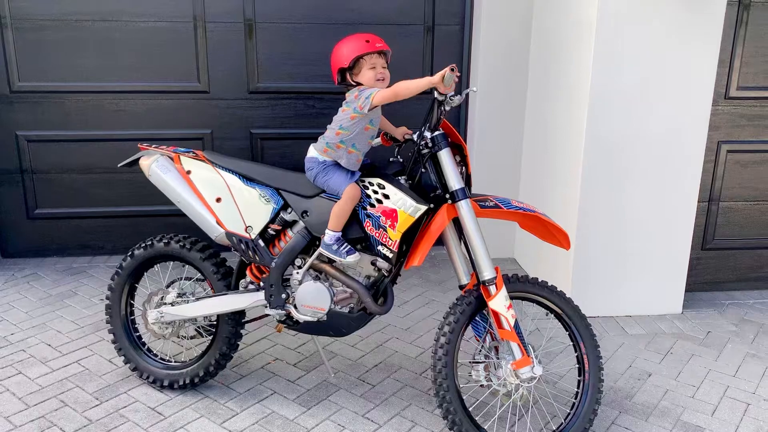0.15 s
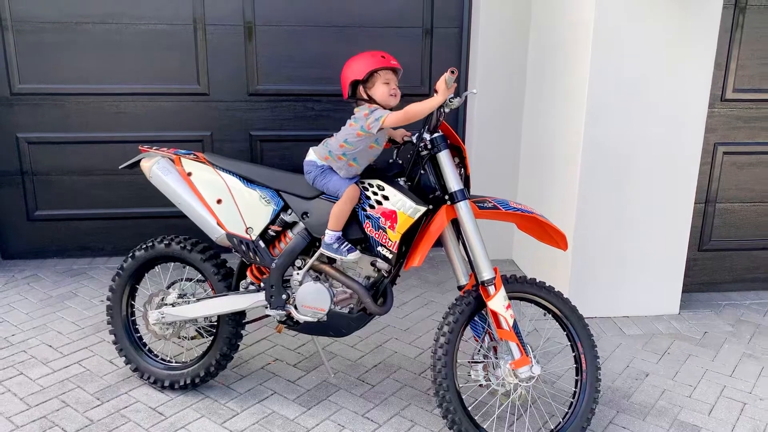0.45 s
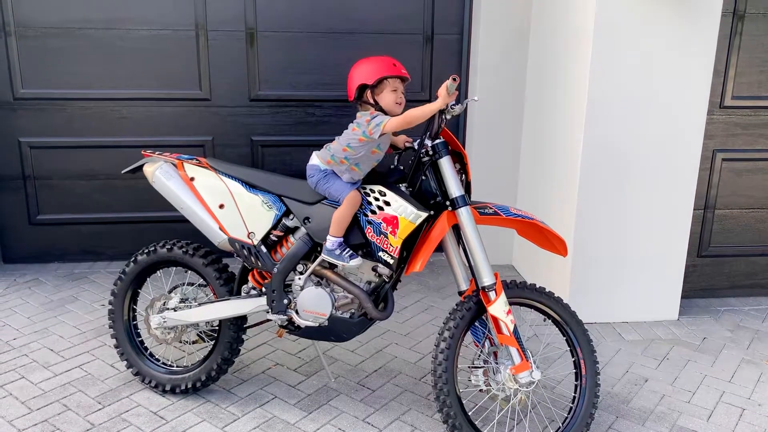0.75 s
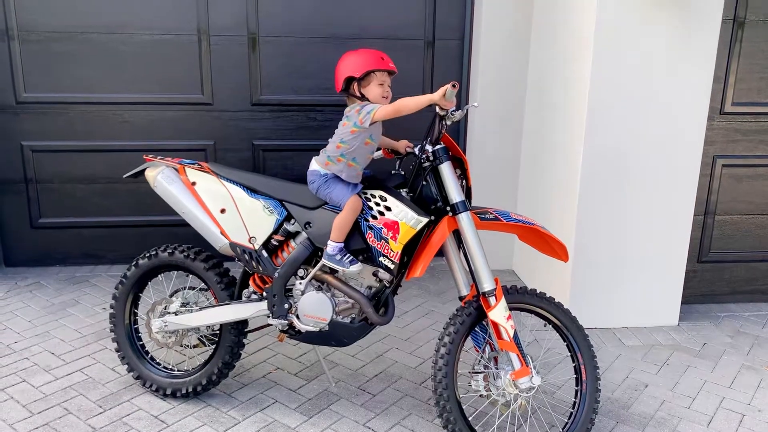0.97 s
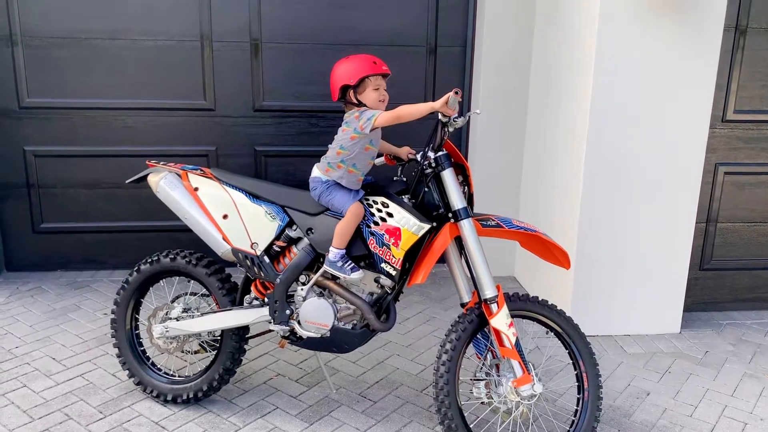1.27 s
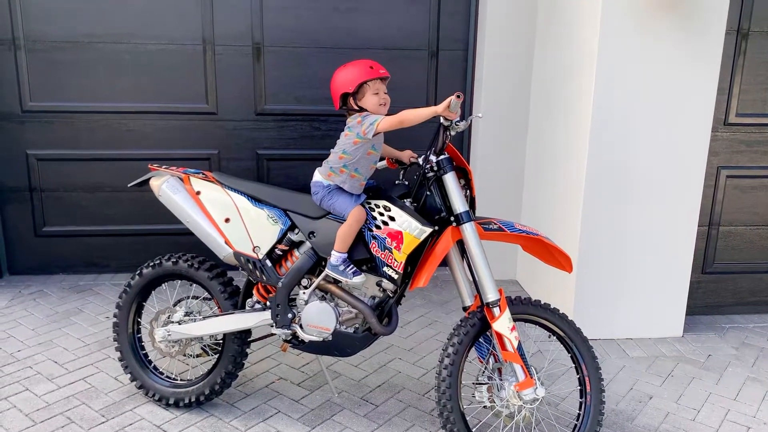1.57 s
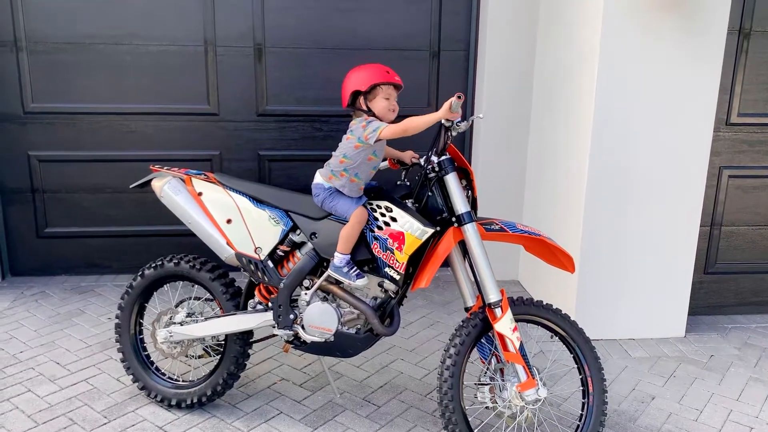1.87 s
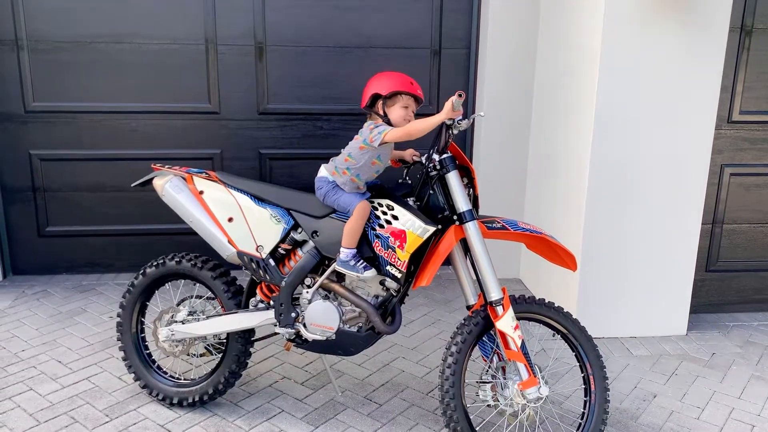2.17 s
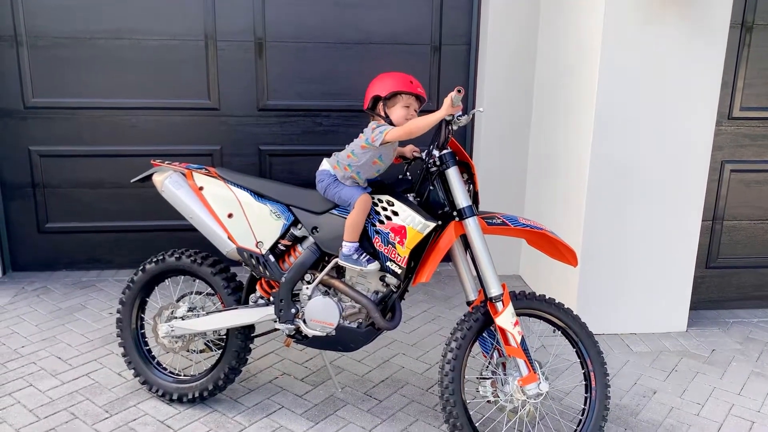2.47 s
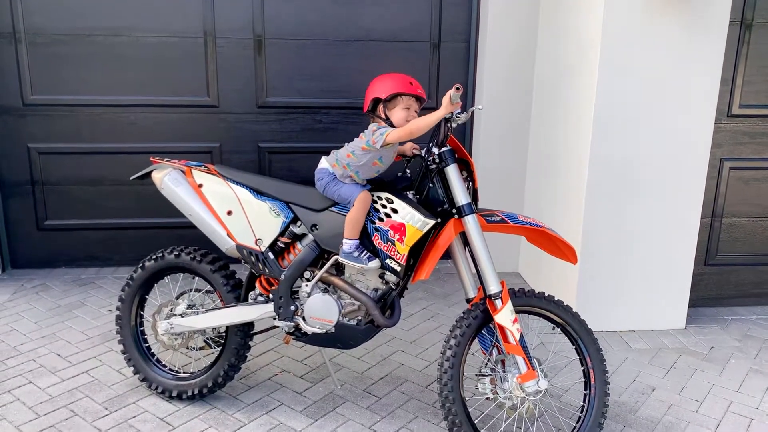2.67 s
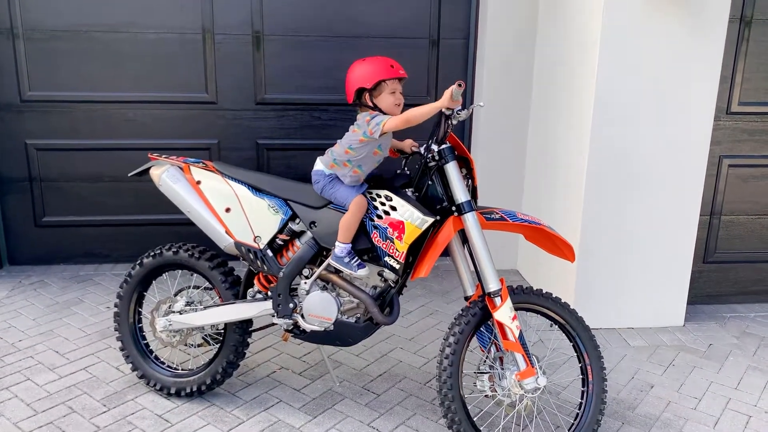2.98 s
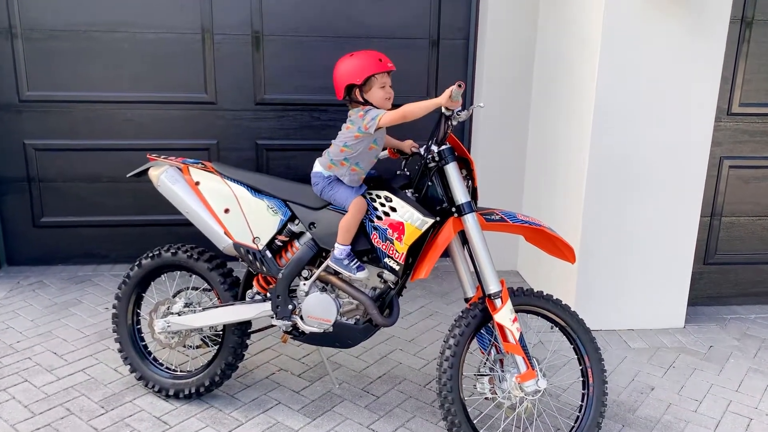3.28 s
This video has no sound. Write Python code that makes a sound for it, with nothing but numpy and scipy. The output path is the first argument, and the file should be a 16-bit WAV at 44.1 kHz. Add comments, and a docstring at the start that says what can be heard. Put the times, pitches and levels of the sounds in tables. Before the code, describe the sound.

A single-cylinder motorcycle gives two throttle blips, dropping back to an uneven, thumping idle.

```python
"""On paving by a garage door, a one-cylinder four-stroke dirt bike idles and revs twice, briefly, then longer.
Each firing pushes a low boom and a puff out of the silencer. With the throttle open, the pipe also
rings with a bark, the gas rasps and a thin whistle joins in. Off the throttle the engine fires unevenly.
The valves clatter all the time, and the ground, door and walls throw the sound back."""
import sys
import numpy as np
from scipy import signal
from scipy.fft import rfft, irfft, next_fast_len
from scipy.io import wavfile

SR = 44100
rng = np.random.default_rng(int(sys.argv[2]) if len(sys.argv) > 2 else 0)


def materialize(psi):
    """Save the field psi as 16-bit PCM at rate SR to the path in sys.argv[1].

    A 1-D psi becomes a single channel; in a 2-D psi each row is a channel.
    """
    bounded = np.clip(np.atleast_2d(psi).T, -1, 1)
    quanta = np.round(bounded * 32767).astype(np.int16)
    wavfile.write(sys.argv[1], SR, quanta)


N = 151263

# Levels in the tables are relative: each sound gets its overall loudness further down.
# how often the engine fires: t/s, rate/Hz
FIRING_RATE = [(0.072, 18.8), (0.26, 19.22), (0.35, 27.07), (0.44, 37.77), (0.62, 49.81), (0.74, 53.02),
               (0.9, 48.31), (1.06, 39.11), (1.21, 30.58), (1.35, 29.25), (1.45, 23.14), (1.72, 20.79),
               (1.94, 20.85), (2.06, 24.9), (2.18, 35.44), (2.36, 39.78), (2.6, 50.33), (2.87, 54.12),
               (3.06, 48.07), (3.28, 36.32), (3.43, 26.88)]
# how loud the main parts are: t/s, boom/dB, bark/dB, treble/dB
LOUDNESS = [(0.072, -4.5, -30, -35.5), (0.276, -2.5, -27.5, -35), (0.323, -2.5, -18, -27),
            (0.36, -3, -15.5, -26.5), (0.419, -7.5, -14.5, -28.5), (0.481, -13.5, -16, -30.5),
            (0.68, -8.5, -18, -31.5), (0.765, -18, -30, -36), (0.8, -12, -30.5, -37),
            (1.062, -8, -31.5, -35.5), (1.188, -11.5, -32, -37.5), (1.298, -13.5, -43.5, -40),
            (1.429, -7, -31.5, -41), (1.676, -6.5, -39, -40.5), (1.926, -8, -31, -40),
            (2.01, -5.5, -27.5, -36.5), (2.099, -5, -22.5, -33), (2.188, -7.5, -19, -34),
            (2.28, -15.5, -17.5, -34), (2.381, -12, -16.5, -33.5), (2.58, -12, -16.5, -32),
            (2.832, -12, -21, -33.5), (2.917, -10, -33.5, -35.5), (3.122, -10.5, -33, -35.5),
            (3.358, -9.5, -36, -40)]
# single firings that burn weakly or strongly: t/s, change/dB
UNEVEN_BURNS = [(.865, 1.5), (.885, -21), (.948, -7), (1.067, 4.5), (1.149, -3), (1.244, -2.5),
                (1.504, -7.5), (1.594, -8), (1.687, -14), (2.939, -13), (2.978, -1.5), (2.998, -12),
                (3.039, -3), (3.08, 3), (3.102, -2), (3.194, 4.5), (3.219, 1), (3.393, -11)]
# single firings with a harder or softer bark and rasp: t/s, change/dB
CRACK_CHANGES = [(0.59, -1), (1.067, 6.5), (1.38, 2), (1.504, -21), (1.594, -12), (1.687, -22),
                 (1.879, 0.5), (2.095, 1), (2.616, 4), (2.732, 3.5), (2.808, 2)]
# tone of the puff: f/Hz, level/dB
PUFF_TONE = [(20, -19.5), (45, 9), (70, -18.5), (120, -7), (160, 12.5), (200, 14.5), (265, 10), (330, 5.5),
             (410, -8.5), (500, 5), (610, -6), (1500, -56), (5000, -93)]
# tone of gas tumbling in the silencer: f/Hz, level/dB
BURBLE_TONE = [(60, -29.5), (110, 3.5), (180, -8), (260, 1), (350, -8.5), (420, -9), (510, -8.5),
               (620, -29), (1200, -57.5)]
# when the valves tick: position/cycle, level/dB
VALVE_TICKS = [(0.097, 13), (0.357, 0), (0.581, 3.5), (0.803, 4.5)]
# notes at which the engine cases ring: f/Hz, width/Hz, level/dB
CASE_RINGS = [(1300, 160, -6), (1570, 72, -31), (2060, 130, 8.5), (2600, 130, -28), (2870, 380, -5),
              (3715, 28, 6), (4380, 670, -15), (6380, 210, 3.5), (8000, 240, 1.5)]
# tone of the rushing chain and gears: f/Hz, level/dB
GEAR_RUSH_TONE = [(100, -51), (400, 19), (1000, 11.5), (1600, 5), (2400, 2.5), (4300, 3.5), (5200, -2.5),
                  (8000, -6), (10500, -4), (14200, -10.5), (15500, -46)]
# echoes off ground, door and wall: delay/s, left gain, right gain
ECHOES = [(.0012, 0.82, 0.69), (.0052, 0.11, 0.47), (.0068, 0.11, 0.071), (0.0145, 0.16, 0.32)]
# time the yard's echo takes to fade by 60 dB: f/Hz, t/s
YARD_FADE = [(100, 0.15), (1000, 0.42), (4000, 0.42), (14000, 0.027)]
# tone of all the echoes: f/Hz, level/dB
ECHO_TONE = [(100, -1.5), (300, -13), (600, -19.5), (1200, 1), (3000, 4), (12000, 1.5)]
# notes at which the exhaust pipe rings: f/Hz, width/Hz, level/dB
PIPE_RINGS = [(236, 17, -3.5), (325, 70, 3.5), (521.3, 15, 8), (677.2, 12.5, 6.5), (854, 37, 3),
              (1078, 57, -3.5), (1223, 41, 8.5), (1359, 87, 0.5), (1551, 56, -1.5), (1675, 60, -1.5),
              (1870, 170, -9), (2280, 110, -24.5), (3090, 35, -11.5)]
# higher pipe notes under hard throttle: f/Hz, width/Hz, level/dB
HIGH_RINGS = [(1661, 76, 5), (1960, 88, -12)]
# those higher notes compared with the bark: t/s, level/dB
HIGH_RING_LEVEL = [(.3, -20), (.65, -3), (.9, -12), (2.2, -22.5), (2.8, -4.5)]
# tone of gas rasping at the pipe's mouth: f/Hz, level/dB
RASP_TONE = [(200, -15), (700, 4), (1600, 5), (2400, -1), (4200, 0), (5300, -4), (7800, -2), (10500, -4),
             (14000, -7), (15500, -22)]
# notes of the turning gears: multiple of the firing rate, level at top speed/dB
GEAR_NOTES = [(13, -42), (14, -51), (17, -60), (18, -43.5), (20, -46)]
# hums as the throttle shuts: start/s, end/s, level/dB
HUM_SPANS = [(0.728, 0.827, -26.5), (2.835, 3.013, -28)]
# how much louder the left side is than the right: f/Hz, level/dB
LEFT_OVER_RIGHT = [(60, 1.5), (130, -2.5), (500, 0.5), (2000, 1.5), (4000, -1), (8000, -0.6), (12000, 0.5)]

START_S = .072  # the first firing
BOOM_LAG_S, PUFF_LEAD_S, BARK_LEAD_S = .01066, .002, .0048  # after (lag) or before (lead) each firing


def amp(db):
    """Turn decibels into a number to multiply by."""
    return 10 ** (np.asarray(db) / 20)


def unit(x):
    """Scale a signal to an average power of 1."""
    return x / np.sqrt(np.mean(x ** 2) + 1e-20)


def along(points, hz):
    """Read between the rows of a (frequency, value) table, spaced by octaves."""
    f, v = np.transpose(points)
    return np.interp(np.log(hz + 1), np.log(f + 1), v)


def filtered(x, response):
    """Scale and delay each frequency in x as response(hz) says."""
    size = 2 * next_fast_len(N // 2 + SR // 4)
    return irfft(rfft(x, size) * response(np.fft.rfftfreq(size, 1 / SR)), size)[..., :N]


def colour(points):
    """Make a filter from a tone table; it never sounds before its input does."""
    def response(hz):
        cepstrum = irfft(np.log(amp(along(points, hz))))
        half = len(cepstrum) // 2
        return np.exp(rfft(np.r_[cepstrum[0], 2 * cepstrum[1:half], np.zeros(half)]))
    return response


def ringing(notes):
    """Make a filter that rings at these notes; narrow ones ring longer."""
    return lambda f: sum((-1) ** k * amp(db) * 1j * f * width / (hz * hz - f * f + 1j * f * width)
                         for k, (hz, width, db) in enumerate(notes))


def through(x, response):
    """Filter x, scaled so that white noise would keep its power."""
    return filtered(x, lambda hz: response(hz) / np.sqrt(np.mean(abs(response(hz)) ** 2)))


def pulses(times, sizes):
    """Put one click at each time."""
    return np.bincount(np.clip(np.round(times * SR).astype(int), 0, N), sizes, N + 1)[:N]


def swells(times, sizes, rise_s, fall_s):
    """A loudness curve that rises and dies away at each time."""
    age = np.arange(SR // 10) / SR
    shape = (1 - np.exp(-age / rise_s)) * np.exp(-age / fall_s)
    return unit(signal.fftconvolve(pulses(times, sizes), shape)[:N])


def changes(rows, firings):
    """Give each listed change in dB to the nearest firing."""
    db = np.zeros(len(firings))
    for s, change in rows:
        db[np.argmin(abs(firings - s))] += change
    return db


def levels(times):
    """Boom, bark and treble levels in dB at these times."""
    s, *columns = np.transpose(LOUDNESS)
    return [np.interp(times, s, column) for column in columns]


def scatter(times, spread):
    """One random nudge for each time."""
    return spread * rng.standard_normal(len(times))


def hiss(spread=.91):
    """White stereo noise, partly shared by both sides."""
    return unit(rng.standard_normal(N) + spread * rng.standard_normal((2, N)))


def boom(firings, period, jitter_s=.0008, low_cut_hz=72):
    """The silencer swells and rings low after each firing; faster gas damps it to a short thump."""
    rate = 1 / period
    slowing = np.clip(-np.gradient(rate, firings) / 30, 0, 1)  # full when the rate drops 30 Hz a second
    times = firings + BOOM_LAG_S + slowing * scatter(firings, jitter_s)  # a slowing engine is ragged
    sizes = amp(levels(firings)[0] - 2 + changes(UNEVEN_BURNS, firings) + scatter(firings, .6))
    idle_and_fast_hz = [22, 38]
    pitch_hz = np.interp(rate, idle_and_fast_hz, [119, 134])[:, None]
    rise_s, fall_s = .0022, np.interp(rate, idle_and_fast_hz, [.0082, .0038])[:, None]
    age = np.arange(-SR // 50, SR // 12) / SR
    swell = 1 / (np.exp(-age / rise_s) + np.exp(age / fall_s))
    swell /= swell.max(axis=1, keepdims=True)
    waves = sizes[:, None] * swell * np.sin(2 * np.pi * pitch_hz * age)
    wave_times = np.round(times * SR)[:, None] / SR + age
    thumps = pulses(wave_times.ravel(), waves.ravel())
    # the boom has little deep bass
    return filtered(thumps, lambda f: f ** 8 / (f ** 8 + low_cut_hz ** 8))


def puff(firings, period, follows_bark=.63, round_trip_s=.0095):
    """Each firing pushes out a puff, which under throttle also runs back down the pipe."""
    boom_db, bark_db, _ = levels(firings)
    push_db = boom_db - 7.5 + follows_bark * (bark_db - boom_db)
    push = np.sqrt(period * SR) * amp(push_db + changes(UNEVEN_BURNS, firings) + scatter(firings, .6))
    returned = push * amp(-5.5 + 3.5 * (bark_db - bark_db.max()))
    times = firings - PUFF_LEAD_S
    return through(pulses(times, push) + pulses(times + round_trip_s, returned), colour(PUFF_TONE))


def burble(t, firings, period):
    """Gas tumbles in the silencer after each firing, so no two thumps are alike."""
    sizes = np.sqrt(period) * amp(changes(UNEVEN_BURNS, firings))
    bursts = swells(firings - BARK_LEAD_S, sizes, rise_s=.0045, fall_s=.014)
    return through(rng.standard_normal(N) * bursts * amp(levels(t)[0] - 19), colour(BURBLE_TONE))


def valve_clatter(t, cycles, tick_s=.0028, pulsing=.4):
    """The valves tick on the engine cases; the chain and gears rush, swelling with each tick."""
    treble_db = levels(t)[2]
    taps = np.zeros(N)
    for position, db in VALVE_TICKS:
        times = np.interp(np.arange(int(cycles[-1])) + position, cycles, t)
        taps += pulses(times, amp(db + scatter(times, 3)))
    bursts = unit(signal.fftconvolve(taps, np.exp(-t[:SR // 20] / tick_s))[:N])
    ticks = through(hiss() * bursts * amp(treble_db - 5), ringing(CASE_RINGS))
    rush = through(hiss() * unit(1 + pulsing * bursts) * amp(treble_db + 3.5), colour(GEAR_RUSH_TONE))
    return ticks + rush


def yard_echoes(bike):
    """The ground, door and walls send back a few clear echoes and a short, blurred tail."""
    hz, age, noise = signal.stft(rng.standard_normal((2, SR // 3)), SR, nperseg=256)
    fade = amp(-60 * age / along(YARD_FADE, hz)[:, None])
    tail = signal.istft(noise * fade, SR, nperseg=256)[1]
    blur = amp(-6) * signal.fftconvolve(bike, tail / np.linalg.norm(tail[0]), axes=1)[:, :N]
    echoes = filtered(bike, lambda f: sum(np.array([[left], [right]]) * np.exp(-2j * np.pi * f * delay)
                                          for delay, left, right in ECHOES))
    return filtered(blur + echoes, lambda f: amp(along(ECHO_TONE, f)))


def bark(firings, period, jitter_s=.00002, leak_lead_s=.002753):
    """A sharp push from each firing makes the pipe ring, loudest under throttle."""
    times = firings - BARK_LEAD_S + scatter(firings, jitter_s)
    push_db = levels(firings)[1] - 4 + changes(CRACK_CHANGES, firings) + scatter(firings, .7)
    push = np.sqrt(period * SR) * amp(push_db)
    leak = pulses(times - leak_lead_s, push * amp(-11))  # the exhaust valve just starting to open
    high = pulses(times, push * amp(np.interp(firings, *np.transpose(HIGH_RING_LEVEL))))
    return through(pulses(times, push) + leak, ringing(PIPE_RINGS)) + through(high, ringing(HIGH_RINGS))


def gas_rasp(t, firings, period, follows_bark=.31, steady_share=.5):
    """Each firing lets out a swirling blast that rings the pipe and rasps at its mouth."""
    _, bark_db, treble_db = levels(t)
    throttle_db = bark_db - bark_db.max()  # 0 at full throttle
    sizes = np.sqrt(period) * amp(changes(CRACK_CHANGES, firings) + scatter(firings, 1))
    bursts = swells(firings - BARK_LEAD_S - .001, sizes, rise_s=.0005, fall_s=.0068)
    blast = through(hiss() * bursts * amp(bark_db - 7.5), ringing(PIPE_RINGS))
    flow = bursts + steady_share * amp(throttle_db) ** .5 * (1 - bursts)  # throttle fills in the gaps
    rasp_db = treble_db + 1 + follows_bark * throttle_db
    return blast + through(hiss() * flow * amp(rasp_db), colour(RASP_TONE))


def whistle(t, pitch_hz=7650, width_hz=300):
    """A thin whistle comes with the open throttle."""
    _, bark_db, treble_db = levels(t)
    whistle_db = treble_db - 5 + 2 * (bark_db - bark_db.max())
    return through(hiss() * amp(whistle_db), ringing([(pitch_hz, width_hz, 0)]))


def gear_whine(rate, cycles):
    """The turning gears sing faint, clean notes that get higher and louder with speed."""
    notes = sum(amp(db) * np.sin(2 * np.pi * (multiple * cycles + rng.random()))
                for multiple, db in GEAR_NOTES)
    return notes * (rate / rate.max()) ** 2


def hum(t, firings, period, pitch_hz=470, fade_s=.042):
    """As the throttle shuts, the engine's pulses ring one hollow note."""
    level = sum(amp(db) * np.clip(np.minimum(t - start, end - t) / fade_s, 0, 1)
                for start, end, db in HUM_SPANS)
    ring = ringing([(pitch_hz, 64, 0)])
    return level * through(pulses(firings, np.sqrt(period * SR)), lambda hz: ring(hz) ** 2)


def scene():
    """The engine's speed times the firings; the bike's sounds and their echoes add up."""
    t = np.arange(N) / SR
    rate = np.interp(t, *np.transpose(FIRING_RATE))
    cycles = np.cumsum(rate) / SR  # one firing per cycle
    cycles -= np.interp(START_S, t, cycles)
    firings = np.interp(np.arange(int(cycles[-1]) + 1), cycles, t)
    period = 1 / np.interp(firings, t, rate)
    bike = (boom(firings, period) + puff(firings, period) + burble(t, firings, period)
            + valve_clatter(t, cycles) + bark(firings, period) + gas_rasp(t, firings, period)
            + whistle(t) + gear_whine(rate, cycles) + hum(t, firings, period))
    return bike + yard_echoes(bike)


def record(dry, left_lead_s=.00008, top_hz=15750):
    """The left side is a little nearer; the sound starts at the first firing, its highest treble cut."""
    sides = np.array([[.5], [-.5]])
    stereo = filtered(dry, lambda hz: amp(sides * along(LEFT_OVER_RIGHT, hz))
                      * np.exp(2j * np.pi * hz * sides * left_lead_s))
    fade_in = np.clip((np.arange(N) / SR - START_S) / .001 + 1, 0, 1)
    return filtered(stereo * fade_in, lambda hz: hz < top_hz)


dry = scene()
out = record(dry)
materialize(out)
```